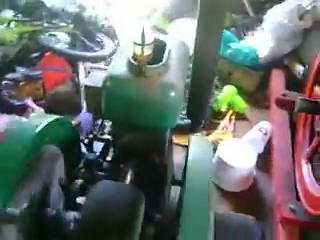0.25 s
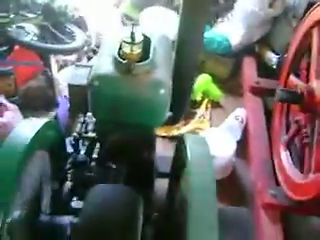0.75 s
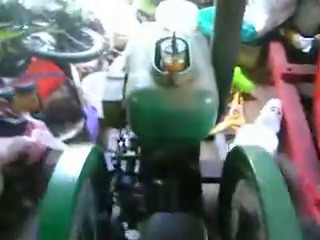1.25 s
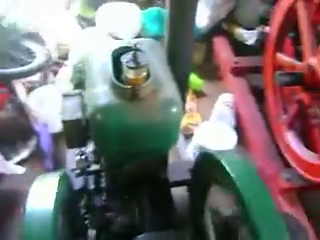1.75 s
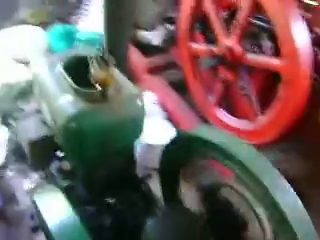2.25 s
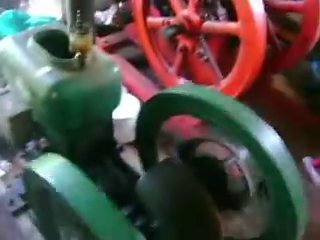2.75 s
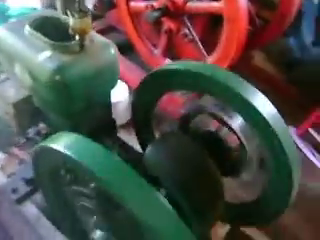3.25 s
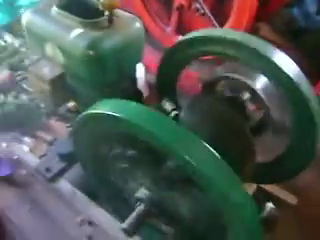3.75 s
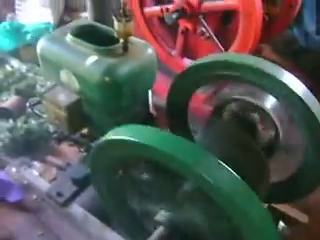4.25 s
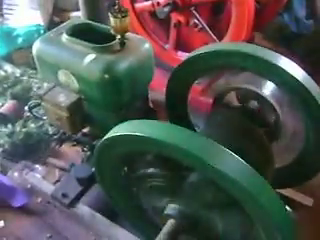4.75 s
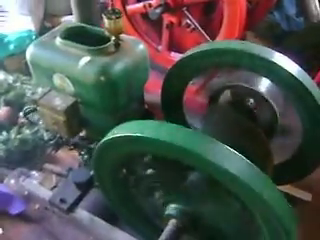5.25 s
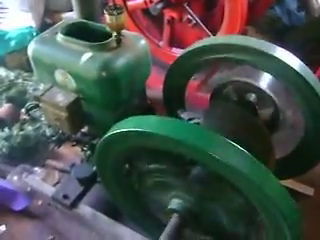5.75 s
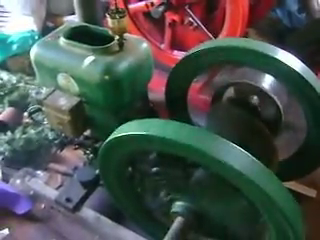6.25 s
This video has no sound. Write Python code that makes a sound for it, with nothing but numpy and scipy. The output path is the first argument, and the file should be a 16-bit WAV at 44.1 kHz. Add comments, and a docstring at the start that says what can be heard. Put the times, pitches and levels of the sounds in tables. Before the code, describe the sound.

An old single-cylinder engine coasts with rattling gears and a clicking latch, sucks air twice, and each time fires one loud, overloaded bang.

```python
"""In a cluttered shed a single-cylinder hit-and-miss engine idles, heard from close by.
While it coasts, gear contacts ring the iron, rods hiss, and the piston pumps air through the open exhaust.
The governor latch clicks once a cam turn except on the two firing turns; then a charge is sucked in,
compressed and fired. Each bang is a pressure front, filtered jet noise, a squeal and a pipe throb,
and it overloads a small, dull microphone."""
import sys
import numpy as np
from scipy import signal
from scipy.fft import rfft, irfft, next_fast_len
from scipy.io import wavfile
from scipy.ndimage import uniform_filter1d

SR = 44100
rng = np.random.default_rng(int(sys.argv[2]) if len(sys.argv) > 2 else 0)


def to_wav(sig):
    """Store sig (one row per channel, or 1-D mono) as 16-bit WAV at the path in sys.argv[1].

    Samples outside -1..1 are clipped; the rate is SR.
    """
    pcm = np.clip(np.atleast_2d(sig), -1, 1) * 32767
    pcm = np.round(pcm).astype(np.int16)
    wavfile.write(sys.argv[1], SR, pcm.T)  # frames by channels


N = 287091
TIME = np.arange(N) / SR

# All levels are relative.
# governor latch clicks: t/s, level/dB, ring of the iron/dB
LATCH_CLICKS = [(0.0327, -28.5, 11.5), (0.4945, -28.5, 14), (0.9818, -29, -4), (1.8315, -31.5, 12.5),
                (2.2388, -32, 9.5), (2.657, -32, 10), (3.0836, -31.5, 13.5), (3.5204, -31.5, 2.5),
                (3.965, -34.5, 13.5), (4.4216, -32, 15.5), (4.8999, -29, 6), (5.7361, -33.5, 1.5),
                (6.1413, -36.5, 15.5)]
# gear teeth hammering at each load reversal: place/cam turn, level/dB, half length/s
LOAD_REVERSALS = [(.06, -35, 0.012), (.24, -33.5, 0.015), (.75, -36.5, .019), (.92, -40.5, 0.01)]
# charges: intake valve lifts t/s, its click level/dB, compression seats it t/s, that click level/dB
CHARGE_CYCLES = [(1.007, -28.5, 1.244, -31), (4.923, -36, 5.1586, -39)]
# firings: t/s, blast level/dB, pipe ring level/dB, rasp level/dB, blow-down/s, trailing hiss level/dB,
# squeal f/Hz, squeal level/dB, pipe throb level/dB, delay until the throb is strongest/s
FIRING_EVENTS = [(1.3451, -8.5, -1.5, -17, 0.022, -13.5, 3539, -6.5, -20, .104),
                 (5.2577, -10.5, 1, -16, 0.022, -20, 3200, -14, -23, 0.11)]
# spectrum of a knock through the gear frame: f/Hz, level per Hz/dB
KNOCK_SPECTRUM = [(20, -45), (50, -32.5), (85, -7.5), (200, -24.5), (270, -20), (330, -2.5), (410, -14.5),
                  (520, 2), (700, 3.5), (950, 1), (1400, -4.5), (2000, -13), (2600, -20), (5000, -40.5)]


def from_db(db):
    """Amplitude ratio of a level: twenty decibels make a factor of ten."""
    return 10 ** (np.asarray(db) / 20)


def rms_one(x):
    """Normalisation of the mean power to one."""
    return x / np.sqrt(np.mean(x ** 2) + 1e-20)


def swell(age, rise_s, hold_s, fall_s):
    """Envelope with a linear rise, a hold until age hold_s and an exponential decay."""
    return np.clip(age / rise_s, 0, 1) * np.exp(-np.maximum(age - hold_s, 0) / fall_s)


def colour(x, spectrum):
    """Minimum-phase filtering: a causal response of given spectrum that keeps the power of white noise."""
    size = 2 ** 13
    hz, db = np.transpose(spectrum)
    bins_hz = np.arange(size // 2 + 1) * SR / size
    gain = rms_one(from_db(np.interp(np.log(bins_hz + 1), np.log(hz), db)))
    # folding the cepstrum onto positive time makes the response causal
    cepstrum = irfft(np.log(gain))[:size // 2]
    cepstrum[1:] *= 2
    response = irfft(np.exp(rfft(cepstrum, size)))
    return signal.fftconvolve(x, response)[:N]


def resonate(x, modes):
    """Modal superposition: parallel damped modes (f/Hz, width/Hz, level/dB), unit power for white noise."""
    t = TIME[:SR // 2]
    response = np.zeros(len(t))
    for k, (hz, width, db) in enumerate(modes):
        decay = width * np.exp(-np.pi * width * t)
        response += (-1) ** k * from_db(db) * decay * np.cos(2 * np.pi * hz * t)
    return signal.fftconvolve(x, response / np.linalg.norm(response))[:N]


def shed(x, wet_db):
    """Reverberation: direct sound plus a dense, exponentially decaying tail from walls and clutter."""
    t60_s = 0.25
    t = TIME[:SR // 2]
    tail = rng.standard_normal(len(t)) * from_db(-60 * t / t60_s) * (t > .004)
    wet = from_db(wet_db)
    reverberant = signal.fftconvolve(x, tail / np.linalg.norm(tail))[:N]
    return (x + wet * reverberant) / np.hypot(1, wet)


def iron(force, favoured_hz=700, focus_db=0, focus_octaves=0.064, scatter=1.0, lowest_hz=170):
    """Modal excitation: each contact drives the modes with random strengths, weighted near one pitch."""
    # cast iron frame and gears: f/Hz, level/dB, t60/s
    iron_modes = [(201, -7.5, 0.054), (311, -6.5, 0.22), (340.7, -1.5, 0.15), (428, -6, 0.17),
                  (501.4, -1.5, 0.18), (548.6, -4.5, 0.27), (601.5, -0.5, 0.1), (721, -5.5, 0.091),
                  (783.6, 0, 0.13), (880, -5.5, 0.048), (1042, 2, 0.03), (1085, -8, 0.12), (1222, 3, 0.022),
                  (1435, -5, 0.092), (1626, -3.5, 0.015), (1920, -26.5, 0.025), (2180, -4, 0.011)]
    out = np.zeros(N)
    for hz, db, t60 in iron_modes:
        radius = from_db(-60 / (t60 * SR))
        angle = 2 * np.pi * hz / SR
        nearness = np.exp(-.5 * (np.log2(hz / favoured_hz) / focus_octaves) ** 2)
        draw = rng.choice([-1, 1]) + scatter * rng.standard_normal(N)
        strength = from_db(db + focus_db * nearness) * draw
        poles = [1, -2 * radius * np.cos(angle), radius * radius]
        out += signal.lfilter([0, np.sin(angle)], poles, force * strength + 1e-18)
    # the ringing is high-passed, so it carries little bass
    return signal.sosfilt(signal.butter(2, lowest_hz, "high", fs=SR, output="sos"), out)


def cam_marks():
    """Kinematic reference: (times, turns), whole at a latch click and a set fraction further at a bang."""
    firing_turn = .745      # place of the bang in its cam turn
    clicks, bangs = np.array(LATCH_CLICKS)[:, 0], np.array(FIRING_EVENTS)[:, 0]
    gaps = np.diff(clicks)
    # the latch stays clear on a firing turn, so a long gap counts as several turns
    turns = np.cumsum([0, *np.round(gaps / np.median(gaps))])
    fired = np.floor(np.interp(bangs, clicks, turns)) + firing_turn
    times = np.sort([clicks[0] - gaps[0], *clicks, *bangs, clicks[-1] + gaps[-1]])
    return times, np.sort([-1, *turns, *fired, turns[-1] + 1])


def cam_turns():
    """Cam angle in turns, by linear interpolation; the crank turns twice as fast."""
    return np.interp(TIME, *cam_marks())


def speed():
    """Angular velocity: the smoothed derivative of cam angle, relative to its mean."""
    rate = uniform_filter1d(np.gradient(cam_turns()), size=SR // 10)
    return rate / rate.mean()


def every_turn(rows):
    """Periodicity: rows of (cam turn, ..) repeat on every turn, as rows of (t/s, ..)."""
    times, turns = cam_marks()
    played = []
    for turn in np.arange(turns[0], turns[-1]):
        for place, *rest in rows:
            played.append((np.interp(turn + place, turns, times), *rest))
    return np.array([row for row in played if 0 < row[0] < TIME[-1]])


def running(level_db, swing_db, top_turn, power):
    """Load modulation: a steady contact's gain swings with cam angle and follows a power of speed."""
    swing = swing_db * np.cos(2 * np.pi * (cam_turns() - top_turn))
    return from_db(level_db + swing) * speed() ** power


def pumping(level_db=-2.0, hum_hz=135, width_hz=15, steadiness=0.55, depth=0.51, top_turn=0.36,
            shut_db=-7):
    """Pipe resonance: narrow-band noise swells once a crank turn and is muffled while a charge is held."""
    # exhaust hum while coasting: t/s, level/dB
    hum_levels = [(0, -55.5), (1.6, -53.5), (3.1, -49.5), (3.8, -52), (4.3, -58.5), (5.6, -54.5),
                  (6.5, -53.5)]
    mode = [(hum_hz, width_hz, 0)]
    noise = resonate(resonate(rng.standard_normal(N), mode), mode)
    hum = signal.hilbert(noise, next_fast_len(N))[:N]
    # dividing by a power of the envelope evens out the noise
    hum = rms_one(hum.real / np.abs(hum) ** np.clip(steadiness, 0, 1))
    stroke = 1 + depth * np.cos(2 * np.pi * 2 * (cam_turns() - top_turn))
    shut = np.zeros(N)
    for charge, bang in zip(CHARGE_CYCLES, FIRING_EVENTS):
        shut += swell(TIME - charge[0], rise_s=.05, hold_s=bang[0] - charge[0], fall_s=.03)
    coasting = from_db(np.interp(TIME, *np.transpose(hum_levels)))
    return from_db(level_db + shut_db * shut) * hum * stroke * coasting


def linkage(slide_db=-1.0, grit_db=-1, ticks_per_s=80, tick_s=0.0069, uneven_db=4, jolt_db=-24):
    """Friction noise: oily rods hiss, springs and pins tick, and both grow at each load reversal."""
    # rods sliding in their guides: f/Hz, level per Hz/dB
    sliding_spectrum = [(500, -2.5), (2000, 14), (2700, -6), (3500, 2.5), (4400, 5), (5300, -8),
                        (6500, -34)]
    sizes = from_db(uneven_db * np.clip(rng.standard_normal(N), -2, 1.5))
    ticks = (rng.random(N) < ticks_per_s / SR) * sizes
    envelope = signal.lfilter([1], [1, -np.exp(-1 / (tick_s * SR))], ticks + 1e-18)
    grit = rms_one(envelope * rng.standard_normal(N))
    rubbing = from_db(slide_db) * rng.standard_normal(N) + from_db(grit_db) * shed(grit, wet_db=-13)
    jolts = np.zeros(N)
    for s, db, half in every_turn(LOAD_REVERSALS):
        near = np.abs(TIME - s) < .1
        jolts[near] += from_db(db + jolt_db) * np.exp(-.5 * ((TIME[near] - s) / half) ** 2)
    steady = running(level_db=-59.5, swing_db=1.5, top_turn=.1, power=1.5)
    return np.hypot(steady, jolts) * colour(rubbing, sliding_spectrum)


def teeth(per_turn=52, uneven_db=2.0, chatter_per_s=900, chatter_db=-7):
    """Meshing impulses locked to the cam, with random chatter: (contacts, share of a tooth since one)."""
    tooth = per_turn * cam_turns()
    meets = np.diff(np.floor(tooth), prepend=np.floor(tooth[0]))
    chatter = from_db(chatter_db) * (rng.random(N) < chatter_per_s / SR)
    sizes = from_db(uneven_db * np.clip(rng.standard_normal(N), -2, 2)) * rng.choice([-1, 1], N)
    return rms_one((meets + chatter) * sizes), tooth % 1


def gears(mesh_db=1.0, backlash_db=-4.0, ring_db=-1.5, knock_db=-3, growl_db=-3, growl_fade=1.0,
          growl_jitter=0.51):
    """Impact excitation: tooth contacts knock and ring the frame; load reversals add a short growl."""
    # pitch at which the iron answers most, as heard from the moving listener: t/s, f/Hz
    iron_pitch = [(0, 599), (1.1, 661), (2.3, 532), (2.75, 626), (3.25, 485), (3.6, 519.5), (4, 847),
                  (5.6, 933), (6.2, 582)]
    late_s, strong_db, high_octaves = 0.002014, 1.0, .1     # scatter of the reversals
    contacts, since_tooth = teeth()
    jitter = growl_jitter * resonate(rng.standard_normal(N), [(40, 60, 0)])

    times, levels, halves = every_turn(LOAD_REVERSALS).T
    late, strong, high = np.clip(rng.standard_normal((len(times), 3)), -2, 2).T
    times = times + late_s * late
    pitches = np.interp(times, *np.transpose(iron_pitch)) * 2 ** (high_octaves * high)
    hammering, growl = np.zeros(N), np.zeros(N)
    vigour = speed() ** 2.5
    for s, db, half, hz in zip(times, levels + strong_db * strong, halves, pitches):
        near = np.abs(TIME - s) < .1
        age = TIME[near] - s
        burst = from_db(db) * vigour[near] * np.exp(-.5 * (age / half) ** 2)
        hammering[near] += burst
        growl[near] += burst * np.sqrt(2) * np.sin(2 * np.pi * hz * age + jitter[near])
    # each tooth renews the growl
    growl *= rms_one(uniform_filter1d(np.exp(-growl_fade * since_tooth), size=60))

    steady = running(level_db=-41.5, swing_db=0.9, top_turn=.95, power=0.43)
    force = contacts * np.hypot(from_db(mesh_db) * steady, from_db(backlash_db) * hammering)
    ringing = iron(force, np.interp(TIME, times, pitches), focus_db=5.5)
    ringing = np.std(force) * rms_one(ringing)
    knocking = shed(colour(force, KNOCK_SPECTRUM), wet_db=-0.5)
    return from_db(ring_db) * ringing + from_db(growl_db) * growl + from_db(knock_db) * knocking


def bearing(ring_db=-14, thud_db=10):
    """Impulse response: play closing in the big end excites a dull knock and the iron modes."""
    # big-end knocks: t/s, level/dB
    knocks = [(0.922, -25.5), (3.475, -25.5), (3.831, -27), (4.374, -31), (5.617, -27)]
    force = np.zeros(N)
    for s, db in knocks:
        force[int(s * SR)] = from_db(db)
    thud = shed(colour(force, KNOCK_SPECTRUM), wet_db=-8)
    return from_db(ring_db) * iron(force) + from_db(thud_db) * thud


def taps():
    """Periodic impacts of push rod and igniter trip, with random strength: (t/s, level/dB, ring/dB)."""
    # taps in every cam turn: place/cam turn, level/dB, ring of the iron/dB
    tap_places = [(.525, -42.5, 3.5), (.63, -41.5, 3.5), (.8, -41.5, -0.5), (.895, -42, 4)]
    scatter_db = 3
    s, db, ring_db = every_turn(tap_places).T
    return zip(s, db + scatter_db * np.clip(rng.standard_normal(len(s)), -2, 1), ring_db)


def valve_clicks(lift_ring_db=-4, seat_ring_db=-10):
    """Valve impacts at lift and at seating by compression: rows of (t/s, level/dB, ring/dB)."""
    rows = []
    for lift, lift_db, seat, seat_db in CHARGE_CYCLES:
        rows += [(lift, lift_db, lift_ring_db), (seat, seat_db, seat_ring_db)]
    return rows


def strikes(rows, level_db, decay_s, ring_db):
    """Impact of steel on steel: a decaying noise crack, and an impulse that rings the frame's modes."""
    # steel crack: f/Hz, level per Hz/dB
    click_spectrum = [(40, -24.5), (150, -6), (350, 10), (1200, 0.5), (1700, 6.5), (2300, 4.5),
                      (3200, -0.5), (4000, 3), (5000, -4), (6500, -27.5)]
    crack, force = np.zeros(N), np.zeros(N)
    for s, db, body_db in rows:
        after = crack[int(s * SR):][:SR // 10]
        after += from_db(db + level_db) * np.exp(-TIME[:len(after)] / decay_s)
        force[int(s * SR)] = from_db(db + body_db + ring_db)
    return shed(colour(crack * rng.standard_normal(N), click_spectrum), wet_db=-6.0) + iron(force)


def intake(level_db=3, snort_db=-7, snort_hz=100, flutter=0.21, unrest=.22, lead_s=0.028):
    """Flow noise past a sprung valve, modulated by its flutter in suction; compression then leaks a little."""
    # air rush: f/Hz, level per Hz/dB
    rush_spectrum = [(25, -18), (70, -12), (170, 4.5), (300, 4.5), (450, 10), (680, 23.5), (1100, 14),
                     (1900, 11.5), (2500, 3), (3300, 10.5), (4500, 9.5), (5300, 6.5), (6500, -26)]
    wobble = resonate(rng.standard_normal(N), [(40, 56, 0)])
    suction, leak = np.zeros(N), np.zeros(N)
    for lift, _, seat, _ in CHARGE_CYCLES:
        suction += from_db(-41.5) * swell(TIME - lift + lead_s, rise_s=0.1, hold_s=0.14 + lead_s,
                                          fall_s=0.038)
        leak += from_db(-43.5) * swell(TIME - seat, rise_s=.006, hold_s=0.019, fall_s=0.029)
    valve = suction * np.sin(2 * np.pi * snort_hz * TIME + .5 * wobble)
    rush = colour((suction + leak + flutter * valve) * rng.standard_normal(N), rush_spectrum)
    return (1 + unrest * wobble) * (from_db(level_db) * rush + from_db(snort_db) * valve)


def blow_down(age, length_s, rise_s, fall_s, tail_db, tail_s):
    """Discharge envelope: gas flow swells as the valve lifts, holds, collapses and trails away."""
    late = np.maximum(age - length_s, 0)
    fall = np.exp(-late / fall_s) + from_db(tail_db) * np.exp(-late / tail_s)
    return np.clip(age / rise_s, 0, 1) ** 2 * fall


def throb(age, pipe_hz=93, width_s=0.027, steep=0.47):
    """Wave steepening: harmonics form a wave bouncing along the pipe; age counts from its strongest return."""
    wave = np.zeros(N)
    for k in range(10):
        wave += np.clip(steep, 0, .9) ** k * np.cos(2 * np.pi * (k + 1) * pipe_hz * age)
    return rms_one(wave) * np.exp(-.5 * (age / width_s) ** 2)


def firing(s, blast_db, pipe_db, rasp_db, length_s, trail_db, squeal_hz, squeal_db, throb_db, throb_s,
           bounce_db=-9, front_db=2, front_hz=300, front_s=0.00085):
    """Blast and jet noise: a pressure front, valve squeal, a roar through pipe and port, then pipe throb."""
    # exhaust pipe and muffler: f/Hz, width/Hz, level/dB
    exhaust_modes = [(148, 40, -8), (300, 32, 3), (385, 60, -2), (612, 30, 3), (704, 30, 5), (804, 26, 0),
                     (922, 24, 4), (1072, 32, -2), (1158, 32, 3), (1520, 80, -4), (1870, 100, -6)]
    # shrill resonances of the valve port: f/Hz, width/Hz, level/dB
    port_modes = [(3010, 150, -6), (3170, 80, -4), (3420, 55, 1), (3695, 65, 0), (3900, 250, -6),
                  (4250, 250, -6), (4720, 250, -4), (5040, 250, -6), (5350, 300, -8)]
    # gas jet: f/Hz, level per Hz/dB
    jet_spectrum = [(20, -28.5), (50, -8.5), (100, 3.5), (200, -7.5), (350, 0.5), (500, -1.5), (900, -1),
                    (1350, -4.5), (1850, 1.5), (2450, -13.5), (3300, -2), (5000, -26.5), (6500, -8)]
    age = TIME - s
    u = np.maximum(age, 0) / front_s
    pulse = u * np.exp(1 - u) * np.sin(2 * np.pi * front_hz * age)
    shock = -from_db(blast_db + front_db) * pulse

    roar = from_db(blast_db) * blow_down(age, length_s, rise_s=0.0068, fall_s=0.012,
                                         tail_db=-17.0, tail_s=0.053)
    rasp = from_db(rasp_db) * blow_down(age - .004, length_s, rise_s=0.0093, fall_s=0.014,
                                        tail_db=trail_db, tail_s=0.023)
    jet = from_db(-3) * colour(roar * rng.standard_normal(N), jet_spectrum)
    pipe = from_db(pipe_db) * resonate(roar * rng.standard_normal(N), exhaust_modes)
    port = resonate(rasp * rng.standard_normal(N), port_modes)

    # the narrow first gap of the valve whistles with a wavering pitch
    slit = from_db(squeal_db) * np.exp(-.5 * ((age - .0095) / 0.0041) ** 2)
    waver = resonate(rng.standard_normal(N), [(147, 35, 0)])
    squeal = slit * np.sin(2 * np.pi * squeal_hz * age + waver)
    bounce = from_db(throb_db + bounce_db) * throb(age - throb_s)
    return shock + bounce + shed(jet + pipe + port + squeal, wet_db=-7.5)


def scene():
    """Linear superposition of the coasting mechanism and its two firing cycles."""
    # mechanism as the listener moves round it: t/s, level/dB
    nearness_levels = [(0, .5), (1.8, 0.7), (3, 0.9), (4.2, -0.9), (5, 0.5), (5.8, -1), (6.5, -1.5)]
    # compression presses the teeth together, so the gears grow quieter just before the leak
    quiet_db, lead_s, half_s = -3.5, .04, .035
    pressed = np.zeros(N)
    for _, _, seat, _ in CHARGE_CYCLES:
        pressed += np.exp(-.5 * ((TIME - seat + lead_s) / half_s) ** 2)
    nearness = from_db(np.interp(TIME, *np.transpose(nearness_levels)))
    mechanism = nearness * (from_db(quiet_db * pressed) * gears() + linkage())
    clicks = strikes(LATCH_CLICKS, level_db=-1, decay_s=0.0071, ring_db=-22)
    clicks += strikes([*taps(), *valve_clicks()], level_db=-4.5, decay_s=0.0067, ring_db=-9.5)
    bangs = sum(firing(*row) for row in FIRING_EVENTS)
    return (pumping() + mechanism + bearing() + clicks + intake() + bangs)[None]


def record(dry):
    """Saturation and band limiting: the microphone rounds peaks and dulls treble.

    The loudest peaks are then clipped flat, adding a faint harsh edge to each bang."""
    mic_top_hz, passband_hz, cutoff_hz = 5450, 6050, 15800
    peak_limit = .71      # clipping amplitude
    rounded = np.tanh(dry)
    dull = signal.sosfilt(signal.butter(10, mic_top_hz, fs=SR, output="sos"), rounded)
    narrow = signal.sosfilt(signal.ellip(12, .1, 90, passband_hz, fs=SR, output="sos"), dull)
    clipped = np.clip(narrow, -peak_limit, peak_limit)
    return signal.sosfilt(signal.ellip(12, .1, 90, cutoff_hz, fs=SR, output="sos"), clipped)


dry = scene()
out = record(dry)
to_wav(out)
```